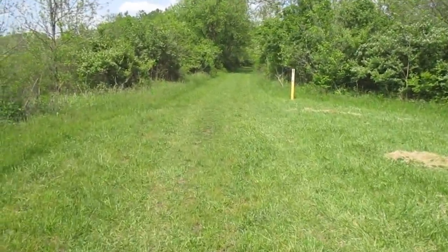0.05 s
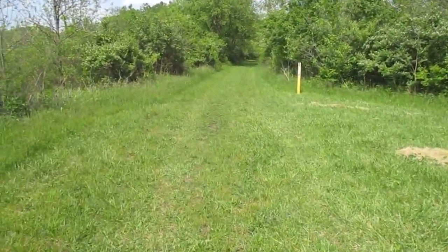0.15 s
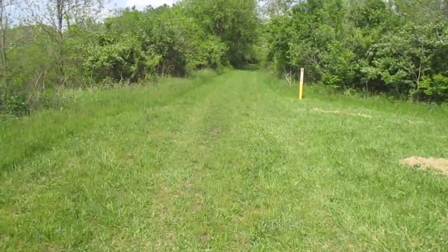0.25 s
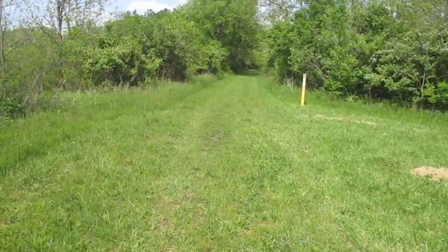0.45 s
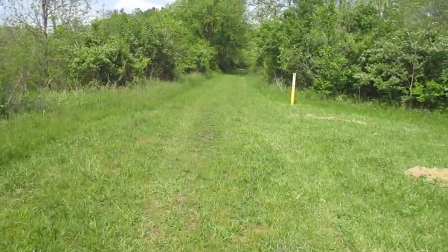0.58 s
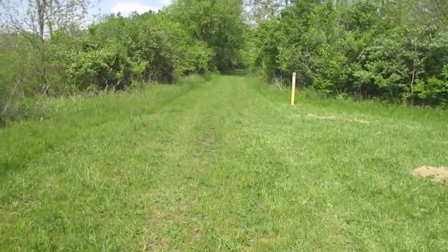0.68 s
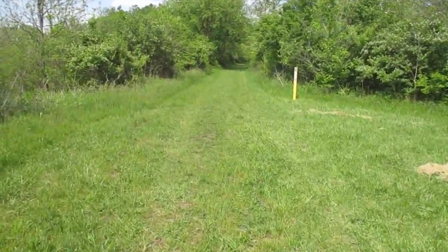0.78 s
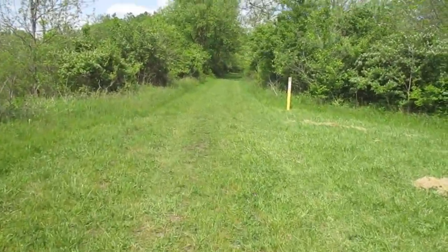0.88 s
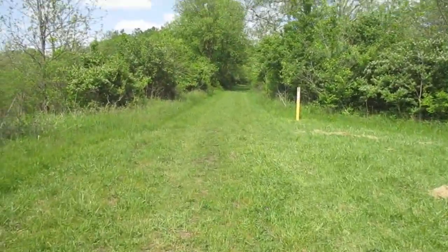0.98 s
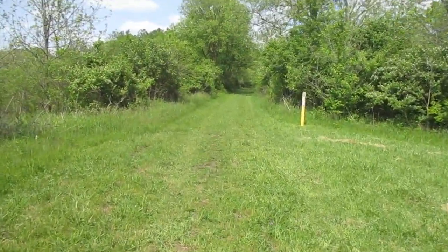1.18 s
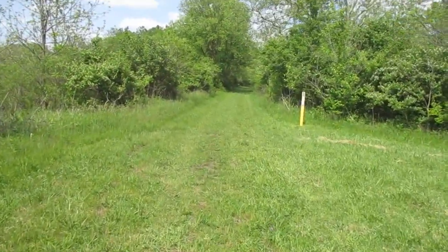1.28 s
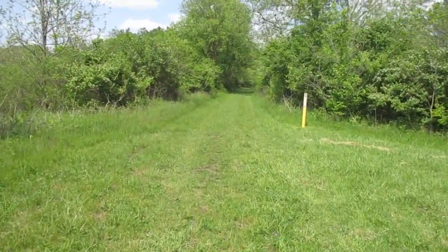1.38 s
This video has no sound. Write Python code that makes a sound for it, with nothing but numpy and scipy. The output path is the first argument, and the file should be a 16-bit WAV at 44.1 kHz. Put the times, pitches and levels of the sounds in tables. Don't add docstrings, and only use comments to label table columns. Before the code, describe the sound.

Footsteps crunch through mown grass outdoors, heard from a small hand-held microphone, with faint distant bird whistles at the start. A hard tick at 0.22 seconds, then blades swish and turf presses until 0.45. A very loud dry snap at 0.54, hollow plastic knocks at 0.62 and 0.65, then small pops, soft rubbing and a fainter step until 1.45, over low wind and leaves.

```python
import sys
import numpy as np
from scipy import signal
from scipy.fft import rfft, irfft
from scipy.io import wavfile

SR = 44100
rng = np.random.default_rng(int(sys.argv[2]) if len(sys.argv) > 2 else 0)


def unload_audio(sound):
    columns = np.transpose(np.atleast_2d(sound))
    steps = np.round(np.clip(columns, -1, 1) * 32767)
    wavfile.write(sys.argv[1], SR, steps.astype(np.int16))


def magnitude_from_level(level_db):
    exponent = np.asarray(level_db, float) / 20
    return 10 ** exponent


N = 63945

# (frequency [Hz], width [Hz], level [dB])
CASE = [(1826, 134, 3.5), (3220, 400, 6.5), (4960, 210, 0), (6600, 550, -4.5), (9120, 1400, -13.5),
        (10030, 1260, -13), (11900, 2300, -27)]
AFTER_HZ = 1670
THIN_HZ = 1100


def evened(x):
    return x / np.sqrt(np.mean(x ** 2) + 1e-20)


def shaped(x, points):
    hz = np.fft.rfftfreq(len(x), 1 / SR) + 1
    f, db = np.transpose(points)
    edge = np.minimum(hz / f[0], 1) ** 3 * np.minimum(f[-1] / hz, 1) ** 3
    gain = magnitude_from_level(np.interp(np.log(hz), np.log(f), db))
    return evened(irfft(rfft(x) * edge * gain, len(x)))


def curve(rows, axis=1, off=None):
    rows = np.array(rows)
    return np.interp(np.arange(N) / SR, rows[:, 0], rows[:, axis], off, off)


def slow(top_hz):
    return evened(signal.lfilter(*signal.butter(2, top_hz, fs=SR), rng.standard_normal(N)))


def bump(s, half):
    return np.exp(-((np.arange(N) / SR - s) / half) ** 2)


def grains(per_s, spread_db, wash):
    size = magnitude_from_level(spread_db * np.minimum(rng.exponential(1, N), 4)) * rng.choice([-1., 1.], N)
    struck = rng.random(N) < per_s / SR
    return evened(size * struck) + wash * rng.standard_normal(N)


def resonate(x, hz, width):
    return signal.lfilter(*signal.iirpeak(hz, hz / width, SR), x)


def case(x):
    return sum((-1) ** k * magnitude_from_level(db) * resonate(x, f, w) for k, (f, w, db) in enumerate(CASE))


def add(mix, s, sound):
    part = mix[round(s * SR):][:len(sound)]
    part += sound[:len(part)]


def air():
    # (frequency [Hz], density [dB per Hz])
    spectrum = [(88, -30), (150, -1.5), (309, -15.5), (555, -23), (649, -6), (1080, -4.5), (3920, -20),
                (8230, -24.5), (16000, -35)]
    # (time [s], level [dB], half length [s])
    lull = (1.4, -7.5, .02)
    level_db = -51.5 + 0.85 * slow(29) + lull[1] * bump(lull[0], lull[2])
    return shaped(rng.standard_normal(N), spectrum) * magnitude_from_level(level_db)


def wind():
    # (frequency [Hz], density [dB per Hz])
    spectrum = [(12, -29), (20, -7), (124, 3.5), (163, 1), (189, -3.5), (253, -1), (300, -3), (390, -46),
                (660, -120)]
    # (time [s], level [dB])
    flow = [(0, -54.5), (.12, -45.5), (.5, -48.5), (.6, -49.5), (.75, -57.5), (1.1, -49), (1.45, -52.5)]
    # (time [s], level [dB], length [s])
    gusts = [
        (0.37, -60, 0.079),
        (0.662, -39, 0.037),
        (0.66, -46, 0.047),
        (1.255, -40, 0.048),
        (1.365, -43, 0.046),
        (.77, -43, 0.038),
        (.24, -48, 0.025),
    ]
    out = shaped(rng.standard_normal(N), spectrum) * magnitude_from_level(curve(flow) + 1.63 * slow(8.6))
    for s, db, length in gusts:
        u = np.arange(0, 1, 1 / SR / length)
        puff = np.sin(np.pi * u) ** 2 * np.cos(2 * np.pi * 2.37 * u)
        add(out, s - length / 2, magnitude_from_level(db - 2.5) * puff)
    return out


def tread():
    # (time [s], level [dB])
    weight = [
        [(0.0, -45), (0.08, -47), (0.086, -43.5), (0.208, -42.5), (0.216, -35), (0.234, -42.5), (0.33, -34.5),
         (0.5, -46), (0.53, -42.5)],
        [(0.7, -55.5), (0.786, -52.5), (0.854, -40), (0.982, -51), (1.026, -45.5), (1.062, -55), (1.082, -50),
         (1.374, -50.5), (1.45, -41.5)],
    ]
    # (frequency [Hz], density [dB per Hz])
    turf = [(130, -41), (220, -12.5), (496, -3.5), (547, -2), (697, -3.5), (1260, -7.5), (2620, -18),
            (4000, -29.5), (5200, -47), (8800, -120)]
    crunch = shaped(grains(per_s=1800, spread_db=2.5, wash=0.97), turf)
    return crunch * magnitude_from_level(curve(weight[0] + weight[1]) + 1.18 * slow(18) - 1.1)


def bird():
    # (time [s], level [dB], top frequency [Hz])
    whistles = [
        (.024, -55, 4230),
        (.094, -54, 4170),
        (.162, -50, 4300),
        (.234, -54, 4200),
        (.517, -54, 4500),
    ]
    note_s, fall_hz = .042, 1100
    out, t = np.zeros(N), np.arange(0, note_s, 1 / SR)
    for s, db, top_hz in whistles:
        hz = top_hz - fall_hz * (t / note_s) ** 1.15
        swell = np.sin(np.pi * (t / note_s) ** 0.57)
        add(out, s, magnitude_from_level(db) * swell * np.sin(2 * np.pi * np.cumsum(hz) / SR))
    return out


def pops():
    # (time [s], level [dB], frequency [Hz])
    dull_pops = [(.086, -38, 550), (0.5062, -29.5, 3250), (0.749, -32, 1570), (0.7842, -37.5, 1300),
                 (0.75, -35, 2900), (0.95, -28.5, 1100), (1.2, -31.5, 990), (0.98, -38, 3900),
                 (1.263, -32, 1600), (1.277, -38, 1160), (1.305, -36, 1470), (1.402, -33, 1200),
                 (.759, -38, 1100), (.91, -33, 1900), (1.245, -36, 2200), (1.34, -39, 3040), (1.4, -34, 1800),
                 (0.93, -34, 1340), (1.342, -46, 1250), (1.3, -37, 5400), (0.69, -25, 5900), (0.68, -35, 2500),
                 (0.44, -34, 1100), (.7415, -30, 3500), (.7405, -36, 6800), (0.86, -38, 3090), (0.71, -35, 880)]
    out, t = np.zeros(N), np.arange(800) / SR
    for s, db, hz in dull_pops:
        life = 4.1 / hz ** 0.64 / 25
        decay = magnitude_from_level(db + 6 - 20 * t / life)
        add(out, s, decay * np.minimum(t / 0.0004, 1) * np.sin(2 * np.pi * hz * t))
    return out


def sweep():
    # (time [s], level [dB], share of fine tips [0-1])
    strokes = [(.165, -56.5, 0.1), (.214, -52.5, 0), (.219, -36, 0.98), (.266, -41.5, 0.52),
               (.33, -50, 0.25), (.385, -36.5, 0.1), (.428, -44, 0.17), (.436, -54.5, 0), (.54, -57.5, 0)]
    # (frequency [Hz], density [dB per Hz])
    stalks = [(880, -52), (1500, -20.5), (2120, 1.5), (2970, -9), (3920, 5.5), (5020, -1.5), (10700, -10.5),
              (16000, -18)]
    # (frequency [Hz], density [dB per Hz])
    fine = [(880, -41), (1500, 3.5), (3590, -21), (4000, -17), (7540, -9.5), (8740, -0.5), (14900, -13),
            (16000, -22)]
    # (time [s], level [dB], half length [s])
    brushes = [
        (1.432, -57.5, 0.035),
    ]
    blades = grains(per_s=8200, spread_db=4, wash=2.0)
    tips = np.clip(curve(strokes, axis=2, off=0.13), 0, 1)
    mix = tips * shaped(blades, fine) + (1 - tips) * shaped(blades, stalks)
    level = magnitude_from_level(curve(strokes, off=-89)) + sum(magnitude_from_level(db) * bump(s, half) for s, db, half in brushes)
    return mix * magnitude_from_level(1.36 * slow(64)) * level


def ticks():
    # (time [s], level [dB], pitch factor [1], ring length [s], sag over the ring [dB])
    hits = [
        (0.216, -14, 1.13, 0.0011, -29.5),
    ]
    # (frequency [Hz], level [dB])
    shell = [(1900, -6), (3500, 1), (5000, -0.5), (6300, -15), (9200, -6)]
    lag_s = 0.000244
    after_db, after_t60 = -15, 0.0073
    out, t = np.zeros(N), np.arange(1200) / SR
    for s, db, pitch, length, sag_db in hits:
        modes = 0
        for hz, level_db in shell:
            u = np.maximum(t - lag_s * (3500 / hz) ** 1.55, 0)
            decay = magnitude_from_level(level_db + sag_db * hz / 3500 * u / length) / (1 + (u / length) ** 9)
            modes = modes + decay * np.sin(2 * np.pi * hz * pitch * u)
        tail = magnitude_from_level(after_db - 60 * t / after_t60) * (t > length)
        after = resonate(rng.standard_normal(len(t)), AFTER_HZ, 1850) * 3 * tail
        add(out, s, np.clip(magnitude_from_level(db) * (after - modes), -1.1, 1.1))
    return signal.sosfilt(signal.butter(4, THIN_HZ, "high", fs=SR, output="sos"), out)


def press():
    # (time [s], level [dB], frequency [Hz])
    pocket = [(.27, -52, 1350), (.295, -37, 1300), (.312, -37, 840), (.335, -31.5, 516), (.352, -42, 480),
              (.375, -40.5, 610), (.41, -44, 650), (.43, -64, 650)]
    width_hz = 350
    turn = np.exp(2j * np.pi * np.cumsum(curve(pocket, axis=2)) / SR)
    r = np.exp(-np.pi * width_hz / SR)
    low = signal.lfilter([1 - r], [1, -r], grains(per_s=900, spread_db=2.5, wash=0.46) / turn)
    low = signal.lfilter([1 - r], [1, -r], low)
    return evened((turn * low).real) * magnitude_from_level(curve(pocket, off=-99))


def knocks():
    # (time [s], hollow level [dB], pitch factor [1], rattle level [dB], rattle centre [Hz])
    blows = [(.3645, -20, 0.622, -47, 2500), (0.423, -57, 1.7, -63, 1998), (0.476, -33, 1.34, -55, 1510),
             (.6503, -55, 1.2, -25.5, 9660), (.62, -17, 1.19, -17, 6600), (.635, -25.5, 0.52, -41, 2320),
             (0.6383, -36, 0.955, -34, 4030), (0.642, -28, 0.82, -50, 9700), (0.6462, -33, 1.21, -41, 4500),
             (.65, -15.5, 1.08, -16, 2760), (0.6566, -23.5, 1.07, -32.5, 8600),
             (.664, -37, 1.16, -23, 2950), (0.68, -26.5, 1.15, -41, 2900), (0.6879, -38, 1.52, -25, 3170),
             (0.71, -39, 1.07, -69, 1960), (0.727, -28.5, 1.405, -53, 3300), (0.745, -50, 0.73, -41, 9000),
             (0.755, -37, 1.45, -53, 1970), (0.7915, -38.5, 0.57, -41, 6300),
             (.6883, -32, 0.91, -31.5, 9250), (0.999, -35.5, 1.04, -56, 2520),
             (1.085, -35, 1.38, -40, 2900), (1.202, -34, 1.46, -52, 2750), (.6202, -42, 3.1, -26.5, 5070),
             (0.73, -43, 1.24, -40.5, 11400), (0.6621, -34, 1.07, -33, 7400), (.671, -53, 1.32, -47, 9000),
             (0.6205, -43, 1.08, -16.5, 3000), (0.6201, -45, 1.18, -18, 11900), (0.57, -52, 1.1, -45, 8600)]
    # (frequency [Hz], level [dB], decay time t60 [s])
    hollow = [(310, -5, 0.015), (705, -2, 0.022), (926, 4, 0.011), (1930, 1.5, 0.0076), (2760, 11, 0.0017)]
    rattle_t60, ping_t60 = 0.007, 0.011
    out, t = np.zeros(N), np.arange(2000) / SR
    for s, hollow_db, pitch, rattle_db, centre_hz in blows:
        burst = magnitude_from_level(rattle_db + 6.5 - 60 * t / rattle_t60) * np.minimum(t / 0.000068, 1)
        burst = burst * rng.standard_normal(len(t))
        rattle = 0.86 * resonate(burst, centre_hz, 0.94 * centre_hz) + 0.66 * case(burst)
        rattle = rattle + 0.015 * np.diff(burst, prepend=0)
        decay = magnitude_from_level(rattle_db - 1 - 60 * t / ping_t60 * (centre_hz / 3000) ** 0.37)
        ping = decay * np.minimum(t / 0.00037, 1) * np.sin(2 * np.pi * centre_hz * t)
        ring = sum(magnitude_from_level(db - 60 * t / t60) * np.sin(2 * np.pi * f * pitch * t) for f, db, t60 in hollow)
        add(out, s, ping + rattle + magnitude_from_level(hollow_db - 0.5) * np.minimum(t / 0.0016, 1) * ring)
    return out


def snap():
    # (frequency [Hz], level [dB])
    brittle = [(6350, -23), (9230, -9.5), (15400, -32)]
    brittle_t60 = 0.0014
    snap_s, snap_db, snap_hz, slack_hz, choke_s = .53822, 3.5, 4116, 1740, 0.00093
    under_db, under_hz, under_lag_s, under_s = -7, 1820, 0.00036, 0.00088
    out, t = np.zeros(N), np.arange(1200) / SR
    hz = np.maximum(snap_hz - slack_hz * (t / 0.0011) ** 2, 500)
    ring = np.sin(2 * np.pi * np.cumsum(hz) / SR) / (1 + (t / choke_s) ** 9)
    u = np.maximum(t - under_lag_s, 0)
    under = magnitude_from_level(under_db) * np.sin(2 * np.pi * under_hz * u) / (1 + (u / under_s) ** 5)
    tail = magnitude_from_level(-7.0 - 60 * t / .012) * (t > choke_s)
    after = resonate(rng.standard_normal(len(t)), AFTER_HZ, 1800) * tail
    add(out, snap_s, np.clip(magnitude_from_level(snap_db) * (after - ring - under), -1.04, 1.04))
    add(out, snap_s, sum(magnitude_from_level(db - 60 * t / brittle_t60) * np.sin(2 * np.pi * f * t) for f, db in brittle))
    return signal.sosfiltfilt(signal.butter(3, 1.18 * THIN_HZ, "high", fs=SR, output="sos"), out)


def rub():
    # (time [s], level [dB])
    slides = [
        [(.575, -53), (.605, -47.5), (.7, -53), (.735, -39), (.752, -55.5), (.8, -56.5), (.95, -58),
         (.962, -48)],
        [(.976, -52), (.998, -43.5), (1.024, -40), (1.056, -51), (1.076, -55), (1.084, -48.5), (1.14, -45),
         (1.156, -55), (1.172, -81)],
    ]
    slips = grains(per_s=6000, spread_db=1.2, wash=0.37)
    hiss = 0
    for f, w, db in CASE:
        band = resonate(resonate(slips, f, 2.0 * w), f, 2.0 * w)
        hiss = hiss + magnitude_from_level(db + 0.74 * slow(11.5)) * band
    return evened(hiss) * magnitude_from_level(curve(slides[0] + slides[1], off=-97) + 1.3 * slow(54) - 0.4)


def thumps():
    # (time [s], level [dB], frequency [Hz], hold [s])
    blows = [
        (0.6195, -15, 703, 0.0043),
        (0.6514, -16.5, 793, 0.0045),
        (0.682, -36, 760, .004),
        (0.7, -42, 685, 0.0088),
        (.621, -22, 1130, 0.0037),
        (0.648, -22.5, 1100, 0.0035),
        (0.6516, -23, 700, 0.0046),
        (0.6513, -24, 337, 0.0057),
    ]
    out, t = np.zeros(N), np.arange(800) / SR
    for s, db, hz, hold in blows:
        envelope = np.minimum(t / 0.0012, 1) / (1 + (t / hold) ** 8.2)
        add(out, s, -magnitude_from_level(db) * envelope * np.sin(2 * np.pi * hz * t))
    return out


def drag():
    # (time [s], level [dB])
    creep = [(.74, -70), (.765, -54.5), (.85, -51.5), (.865, -50.5), (.91, -54.5), (.94, -57), (.97, -58),
             (1.0, -70)]
    # (frequency [Hz], density [dB per Hz])
    palm = [(1900, -3), (2500, -0.5), (3500, -1.5), (3900, -27), (4600, -17), (5600, -3.5), (6700, -7.5),
            (7400, -6.5)]
    slips = shaped(grains(per_s=4300, spread_db=2.5, wash=0.66), palm)
    return slips * magnitude_from_level(curve(creep, off=-99) + 1.2 * slow(40))


def scene():
    surroundings = air() + wind() + bird()
    grass = tread() + pops() + sweep() + press()
    hand = ticks() + knocks() + snap() + rub() + thumps() + drag()
    return (surroundings + grass + hand)[None]


def roll_off(x):
    return signal.sosfilt(signal.butter(12, 16950, fs=SR, output="sos"), x)


def record(dry):
    duck_from_db, duck_share, recover_db_per_s = -29, 0.98, 150
    power = signal.lfilter(np.ones(60) / 60, 1, dry[0] ** 2)
    power_db = 10 * np.log10(abs(power) + 1e-12)
    fall = np.arange(N) * recover_db_per_s / SR
    wanted_db = duck_share * (power_db - duck_from_db - 10.0)
    over_db = np.maximum(np.maximum.accumulate(wanted_db + fall) - fall, 0)
    late_db = signal.lfilter(np.ones(40) / 40, 1, np.roll(over_db, 45))
    narrow = signal.oaconvolve(dry, signal.firwin(401, 15850, fs=SR)[None], "same")
    return roll_off(np.clip(narrow / magnitude_from_level(late_db), -.98, .98))


dry = scene()
out = record(dry)
unload_audio(out)
```